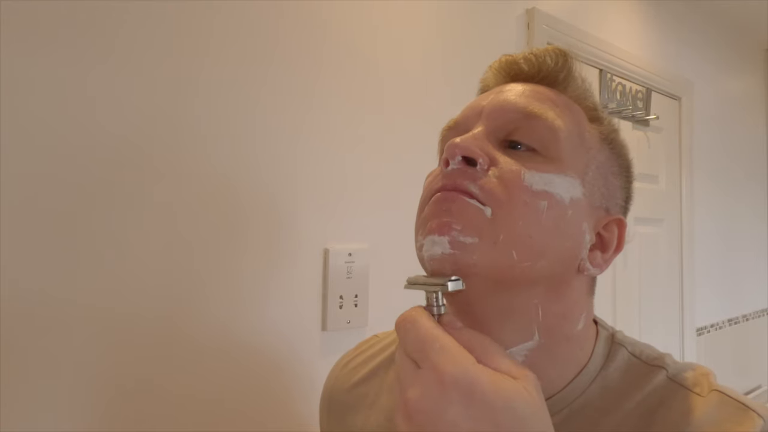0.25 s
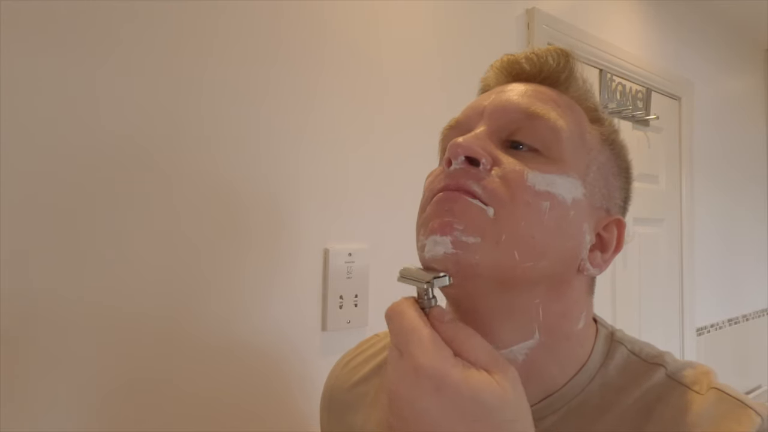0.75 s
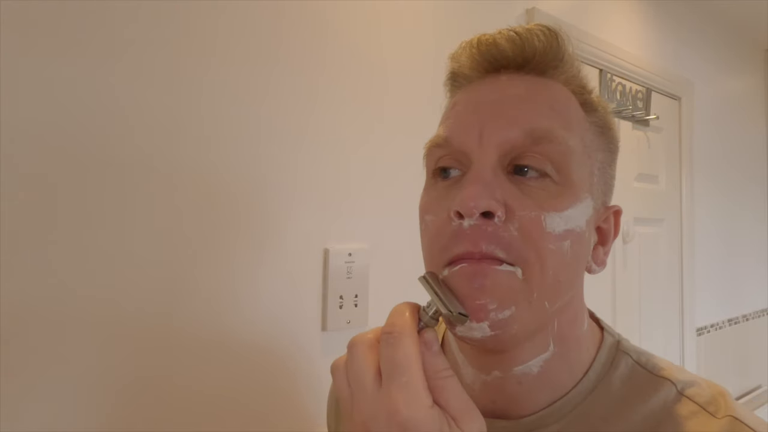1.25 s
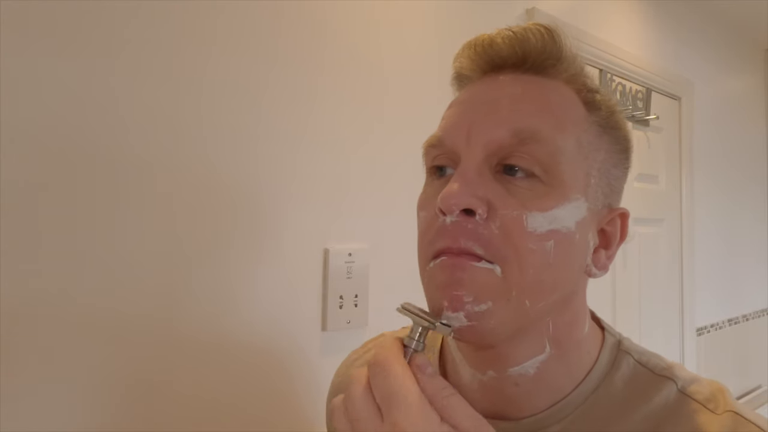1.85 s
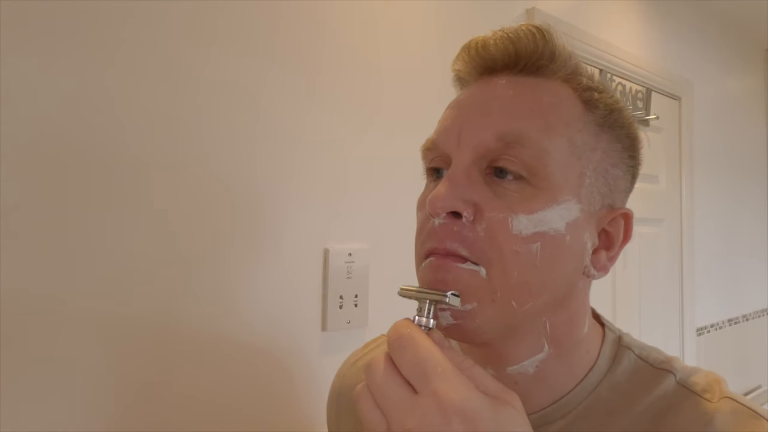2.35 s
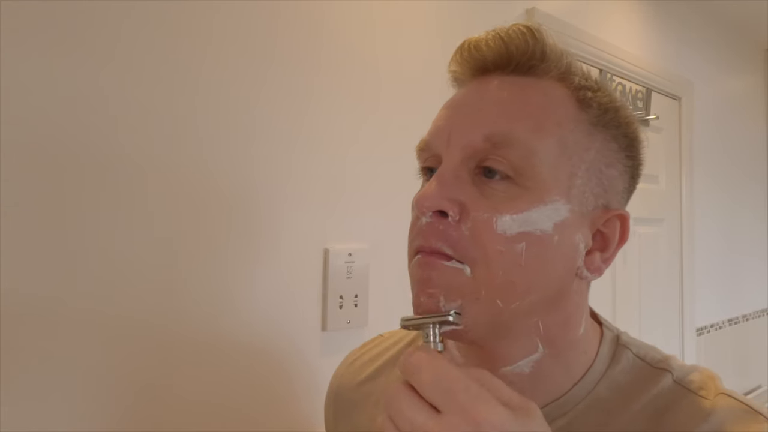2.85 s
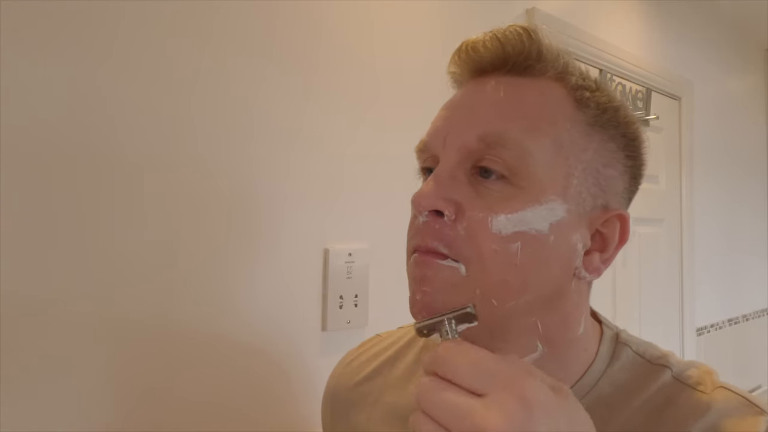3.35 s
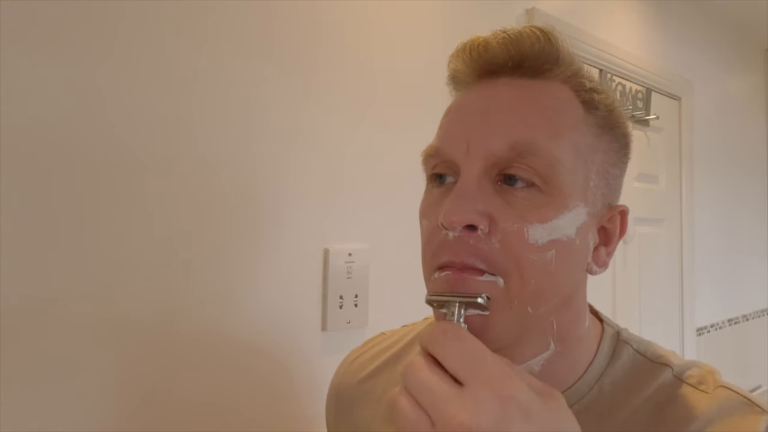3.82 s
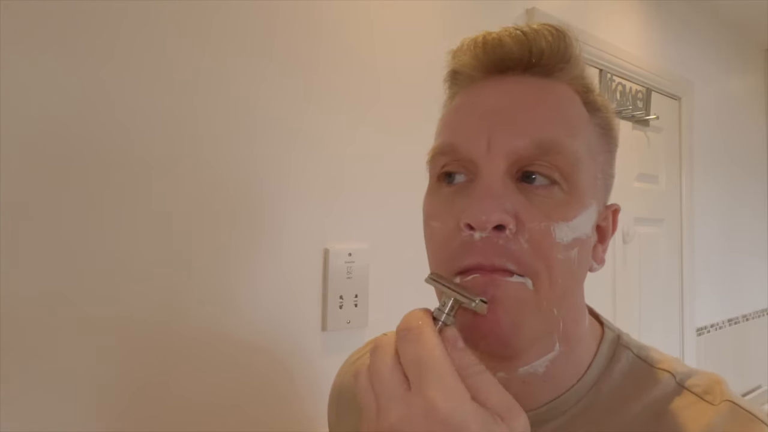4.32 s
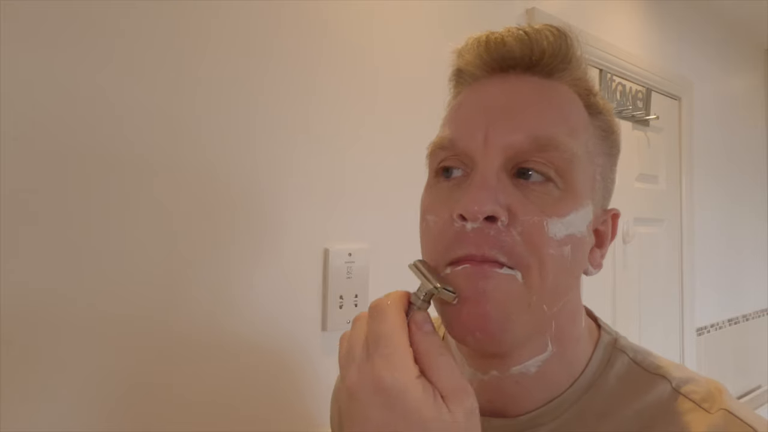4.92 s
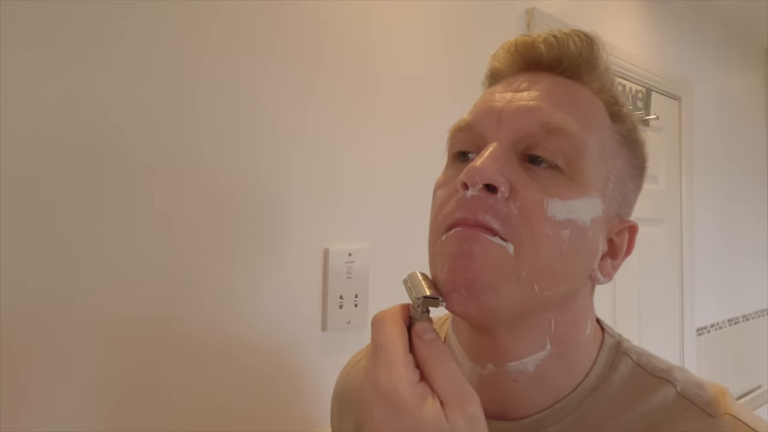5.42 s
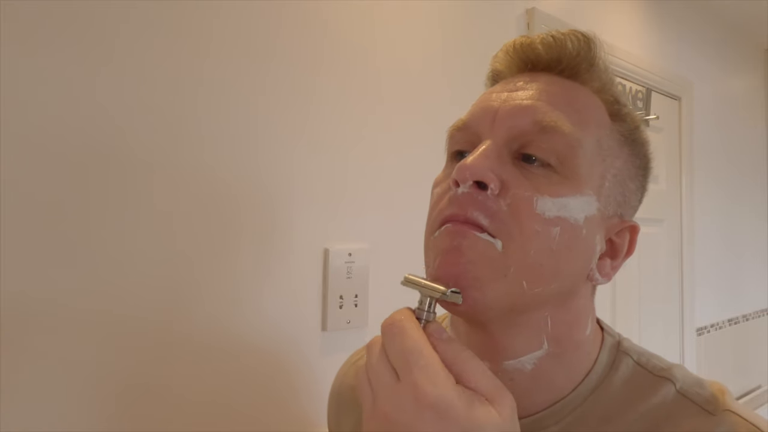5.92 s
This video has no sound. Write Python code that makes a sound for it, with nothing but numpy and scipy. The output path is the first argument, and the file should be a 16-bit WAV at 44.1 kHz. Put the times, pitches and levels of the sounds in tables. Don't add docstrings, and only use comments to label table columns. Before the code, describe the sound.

A loose pipe knocks loudly on a hollow wall panel, slowing to a stop, while a safety razor scrapes stubble in short crisp strokes.

```python
import sys
import numpy as np
from scipy import signal
from scipy.fft import rfft, irfft, next_fast_len
from scipy.io import wavfile
from scipy.ndimage import uniform_filter1d

SR = 44100
rng = np.random.default_rng(int(sys.argv[2]) if len(sys.argv) > 2 else 0)


def put_to_file(sound):
    columns = np.atleast_2d(sound).T
    safe = np.clip(columns, -1, 1)
    whole_steps = np.round(safe * 32767)
    wavfile.write(sys.argv[1], SR, whole_steps.astype(np.int16))


def invert_db(level):
    return 10 ** (np.asarray(level, dtype=float) / 20)


N = 272097
TIME = np.arange(N) / SR

# start_s, rumble_db
AIR = [
    (0.0, -33),
    (1.0, -38),
    (2.2, -34),
    (3.7, -39),
    (4.33, -34),
    (5.15, -36),
    (5.5, -33.5),
    (6.17, -35.5),
]
# pitch_hz, level_db (per Hz)
VENT_TONE = [(30, -18.5), (50, -14.5), (110, -14.5), (200, -5), (350, -3), (456, -11.5), (810, -11),
             (910, -19.5), (1080, -17.5), (2480, -27.5), (7200, -41.5), (9000, -89.5)]
# pitch_hz, width_hz, level_db
DUCT_RESONANCES = [(73.4, 32, -11), (157.8, 28.4, -6.5), (246.4, 12.9, -4.5), (348.5, 17.3, -10)]
# pitch_hz, level_db
HISS_TONE = [(7000, 0.5), (8400, 3.5), (9900, 1), (11500, 8), (13200, 4.5), (14300, -6)]
# pitch_hz, level_db
PORT_TONE = [(10400, -42.5), (10900, -2.5), (11900, 3.5), (12500, 13.5), (13100, -2.5), (13900, -34.5)]
RUSH_DB, RUSH_FOLLOWS = -33.5, 0.62

# start_s, level_db
FLOW = [(0.0, -45), (0.66, -49), (1.0, -48), (1.32, -47), (1.52, -49.5), (2.3, -51.5), (2.72, -65),
        (2.84, -45), (3.0, -42.5), (3.2, -46.5), (3.4, -61), (3.7, -75), (5.7, -65), (5.88, -47),
        (5.97, -44), (6.17, -42)]
# pitch_hz, level_db
WATER_TONE = [(1200, -12.5), (1900, 19), (2500, 19.5), (3200, 8), (5000, 3.5), (7000, -72.5)]

# start_s, pipe_ring_db, panel_db (re ring), upper_panel_db (re ring)
RATTLES = [(0.0024, -24, 4.5, 17.5), (0.1096, -19, -19, -0.5), (0.2384, -29, -15, -4),
           (0.2758, -19, -18, 3), (0.3042, -20.5, -2, -2), (0.3451, -31, -14, 2), (0.36, -28, -7, -5),
           (0.4135, -24, -11, -3), (0.4509, -28.5, -18, 1), (0.7651, -16, -3.5, -8.5),
           (0.7894, -24, -16, 10.5), (0.862, -29, -18, -8), (0.877, -32, -19, -7), (0.9215, -15, -30, -16),
           (0.9427, -10.5, -12, -5), (0.967, -25, -16, -8), (0.984, -26, -15, -8),
           (1.0689, -33.5, 4.5, -16), (1.282, -16.5, -3.5, 2), (1.49, -13, -11, 0.5),
           (1.5304, -33, -11, 18), (1.5698, -35, -19, -3.5), (1.6043, -17.5, -8.5, -12),
           (1.9011, -25.5, -36, -12), (1.9325, -24, -29, -13), (2.0994, -37, -13, 8)]
# start_s, level_db, pitch_hz
TICKS = [(0.0024, -24, 5200), (0.1096, -36, 4800), (0.2384, -23.5, 2850), (0.2758, -35, 3370),
         (0.4135, -48, 3670), (0.4509, -43, 4900), (0.558, -31, 4770), (0.7657, -27, 3470),
         (0.779, -28.5, 3400), (0.7894, -37, 3870), (0.803, -36.5, 3700), (0.9188, -33, 2860),
         (0.954, -34, 3300), (1.0687, -33, 3770), (1.477, -21, 2280), (1.519, -25, 3570),
         (1.5304, -30, 2860), (1.543, -29, 3400), (1.5698, -31, 3020), (1.627, -38, 2920),
         (1.9011, -29, 5800), (1.9325, -26.5, 3440), (2.0994, -33, 4400)]
# start_s, level_db, pitch_hz, width_hz, length_s
RUBS = [(.011, -17, 872, 75.6, 0.035), (0.013, -20.5, 1120, 74, 0.021), (0.159, -28, 1110, 120, 0.015),
        (0.288, -27, 877, 120, 0.015), (0.4555, -30, 1120, 150, 0.016), (0.452, -24, 476, 120, 0.016),
        (0.477, -37.5, 1100, 216, 0.02), (0.766, -26, 861, 120, 0.02), (0.781, -21, 870, 60, 0.016),
        (0.944, -26, 1100, 102, 0.018), (0.94, -18, 614, 59.6, 0.033), (1.116, -28, 850, 277.8, 0.02),
        (1.128, -15, 750, 120, 0.012), (1.143, -21, 860, 150, 0.014), (1.365, -26, 748, 150, 0.014),
        (1.438, -29.5, 851, 111, 0.014), (1.49, -26, 877, 185, 0.016), (1.756, -35, 727, 120, 0.014),
        (1.933, -43, 3580, 244, 0.043), (2.103, -44, 4540, 300, 0.043), (2.362, -52, 2430, 25, 0.09),
        (2.444, -47, 2430, 24.8, 0.087), (3.325, -42, 2300, 250, 0.01)]
CLIP_TOP_DB = -6

# start_s, panel_db, stud_thud_db, pipe_ring_db, crack_db
KNOCKS = [(0.0429, 1.1, 15.5, 1.5, 2.5), (0.2006, 1.7, 12, 1.5, -5.5), (0.376, 0, 11.5, -11, -7),
          (0.5296, 2, 14.5, 2.5, 0.5), (0.7048, 0.8, 11.5, -9, 4.5), (0.839, 2, 11, 6.5, 2.5),
          (1.0299, -1.5, 14, 3, -5), (1.179, -0.4, 14, -11.5, -13.5), (1.3828, 1.8, 17, -0.5, -1.5),
          (1.5078, 2.5, -16, -11.5, 8), (1.6689, -1.5, -1, -6, -4.5), (1.8299, -0.5, 13, -3.5, -11),
          (2.0431, 2, 2, 0.5, -3.5), (2.2514, 0.5, 5.5, -1, 0.5), (2.4757, 0.2, -9.5, -1, -2),
          (2.689, 0.8, -7, -2.5, -11.5), (2.922, -0.4, -18, -6.5, -6), (3.16, 0, -27, -6, -21),
          (3.427, -0.5, -16, -14, -14)]
DEEP_STUD_DB = [-3, 7, 13.5, -4, 3.5, 6, -1, -5, 0, -1, -3, -8, -1, -1, -3, -1, 0, 0, -2]
# pitch_hz, level_db, t60_s, first_swing (direction)
PANEL_MODES = [(175.3, -30.5, 0.314, 1), (307.0, -17.9, 0.271, 1), (322.2, -15.2, 0.18, -1),
               (323.8, -19.1, 0.468, 1), (337.1, -30.1, 0.607, 1), (345.4, -10.0, 0.238, 1),
               (359.0, -27.3, 0.607, 1), (370.7, -8.2, 0.278, -1), (394.1, -10.3, 0.249, 1),
               (409.0, -23.5, 0.488, 1), (420.8, -11.4, 0.137, -1), (432.6, -13.3, 0.155, -1),
               (460.1, -21.4, 0.402, -1), (470.6, -26.5, 0.607, -1), (478.0, -29.0, 0.442, 1),
               (495.4, -28.3, 0.607, -1), (507.3, -16.0, 0.245, -1), (531.2, -20.1, 0.258, -1),
               (557.5, -12.7, 0.107, -1), (575.0, -19.5, 0.21, 1), (623.9, -38.2, 0.607, 1),
               (627.8, -11.3, 0.054, 1), (737.5, -21.5, 0.133, 1), (861.1, -23.9, 0.232, 1)]
# pitch_hz, level_db, t60_s, first_swing (direction and size)
STUD_MODES = [(165.5, -26.5, 0.21, 0.51), (149.6, -27, 0.16, -0.51), (126.4, -35, 0.22, 0.31)]
# pitch_hz, level_db, t60_s
UPPER_MODES = [(691, -20.5, 0.08), (744, -25.5, 0.21), (829, -20, 0.069), (899, -24, 0.18),
               (963, -31, 0.16), (1085, -27, 0.15), (1129, -14.5, 0.036), (1117, -22, 0.096)]
# pitch_hz, level_db, t60_s
PIPE_MODES = [(1903, -36, 0.088), (1986, -20.5, 0.029), (2040, -16.5, 0.024), (2460, -38.5, 0.03),
              (2738, -32, 0.04), (2890, -26, 0.027)]
# pitch_hz, level_db, t60_s
HARD_EDGE_MODES = [(2814, -31, 0.048), (3630, -37.5, 0.037), (4650, -37.5, 0.037), (4910, -38, 0.035),
                   (5370, -40, 0.038), (5800, -36, 0.035), (6110, -41.5, 0.05)]
# pitch_hz, level_db
CRACK_TONE = [(1000, -6), (1450, 4), (3000, 2), (3700, -0.5), (4200, -2), (5200, -5.5), (5850, 0.5),
              (6600, -12), (8500, -38.5)]
# pitch_hz, level_db
CONTACT_TONE = [(6500, -5.5), (9000, -3), (15500, -8)]
# pitch_hz, level_db
BUZZ_TONE = [(480, -9), (600, 3.5), (900, -1), (1200, -7), (1400, -20)]
UPPER_DB, UPPER_PER_PANEL, UPPER_PER_CRACK, UPPER_DB_PER_S_SLOWER = -1.5, 1.4, 0.083, -110
SOFTEN_DB_PER_S_SLOWER = -58
PANEL_ECHO_DB = -22

# land_s, pull_s, blade_db (at lift-off), swell_db (during the pull), skin_db (re blade)
STROKES = [(.045, 0.068, -58.5, -5, 7), (.140, 0.042, -37.5, 3.5, -3), (.462, 0.042, -37.5, 16, -2),
           (.742, 0.12, -45, 2, 2), (1.306, 0.089, -36, 18, 0), (1.676, 0.1, -37.5, 18, -2.5),
           (2.066, 0.079, -40, 4, -0.5), (2.433, 0.05, -34, 2, -5.5), (2.803, 0.1, -38.5, 13, 2),
           (3.245, 0.056, -36, 10.5, 1), (3.557, 0.039, -40, 9, -1), (3.86, 0.035, -41, 26, 1),
           (4.11, 0.036, -44.5, 18, 6.5), (4.42, .11, -38.5, 34, 0.5), (4.75, 0.067, -37, 36, 0),
           (5.01, 0.064, -42.5, 18, 2.5), (5.345, 0.17, -55.5, 4, 8), (5.497, 0.12, -47.5, -7, 0),
           (5.925, 0.083, -32.5, 15, -3)]
# start_s, peak_db
CATCHES = [(0.1446, -30), (0.4483, -37), (0.4665, -17), (0.744, -27.5), (0.7607, -33), (1.3084, -43),
           (1.321, -36), (1.351, -17.5), (1.678, -30), (1.6945, -33), (1.7245, -31), (2.0313, -35),
           (2.0736, -19.5), (2.4059, -44), (2.435, -39), (2.4638, -17), (2.7894, -48), (2.8049, -23),
           (2.8374, -18), (2.8928, -40), (3.2475, -40), (3.268, -35), (3.297, -28), (3.5698, -22),
           (3.5962, -23.5), (3.8793, -44), (3.895, -48), (4.131, -43), (4.1435, -42), (4.4957, -33),
           (4.518, -21), (4.535, -32), (4.8364, -39), (5.0763, -21), (5.498, -20), (5.512, -24),
           (5.9283, -21), (5.941, -34), (5.9674, -13), (5.991, -18), (6.02, -27)]
# start_s, drag_db (re blade)
LATHER_LEFT = [
    (0, -7),
    (1.4, -5),
    (2.45, -9),
    (2.85, 0),
    (3.6, -6),
    (4.13, 8),
    (4.5, -4.5),
    (5.05, 1.5),
    (5.5, -3.5),
    (5.95, -2.5),
]
# pitch_hz, level_db
BLADE_TONE = [(8900, -18.5), (9600, -6.5), (10500, -10), (11400, 1.5), (12200, -1.5), (12800, -3.5),
              (13300, -8), (14600, -30.5)]
# pitch_hz, width_hz, level_db
EDGE_MODES = [(10600, 470, -13.5), (11230, 850, -16.5), (12630, 600, -11.5), (6670, 1900, -8.5)]
# pitch_hz, level_db
SKIN_TONE = [(2600, -16), (3500, 1.5), (4500, 4.5), (7000, -1), (8300, -8), (9300, -3.5)]
# pitch_hz, level_db
LATHER_TONE = [(900, -18.5), (1700, -10.5), (2500, -5.5), (3200, -8.5), (4200, -21)]
LAND_DB_PER_S, SWELL_CURVE = 1503, 0.43
LIFT_DB, LIFT_S = -9.5, 0.056
BLADE_DB_PER_S, SKIN_DB_PER_S, LATHER_DB_PER_S = -140, -99.5, -38
SKIN_LAGS_DB = 0.5


def unit(x):
    return x / np.sqrt(np.mean(x ** 2))


def curve(table):
    s, *columns = np.transpose(table)
    return [np.interp(TIME, s, column, right=column[-1]) for column in columns]


def walk(rate_hz):
    hold = int(SR / rate_hz)
    steps = np.repeat(rng.standard_normal(N // hold + 1), hold)
    return unit(uniform_filter1d(uniform_filter1d(steps, hold), hold)[:N])


def colour(x, tone):
    hz, db = np.transpose(tone)
    size = next_fast_len(len(x))
    log_hz = np.log(np.arange(size // 2 + 1) * SR / size + 1)
    gain = invert_db(np.interp(log_hz, np.log(hz), db, left=-90, right=-90))
    return unit(irfft(rfft(x, size) * gain, size)[:len(x)])


def resonance(x, hz, width_hz):
    peak = signal.iirpeak(hz, hz / (1.5 * width_hz), fs=SR)
    return unit(signal.lfilter(*peak, signal.lfilter(*peak, x)))


def add(out, s, sound):
    start = max(int(s * SR), 0)
    out[start:start + len(sound)] += sound


def fades(times, db, t60):
    blows = np.zeros(N)
    np.add.at(blows, np.clip(times * SR, 0, N - 1).astype(int), invert_db(db))
    return signal.lfilter([1], [1, -np.exp(-np.log(1000) / (t60 * SR))], blows)


def strike(times, db, modes, scatter_db=0., detune=0., tilt_db=0.):
    out, t = np.zeros(N + SR), TIME[:SR // 2]
    modes = np.array(modes)
    hz, mode_db, t60 = modes[:, :3].T[:, :, None]
    if modes.shape[1] > 3:
        swing = modes[:, 3:]
    else:
        swing = (-1) ** np.arange(len(modes))[:, None]
    fade = np.exp(-np.log(1000) * t / t60)
    chance = rng.standard_normal((len(times), 2, len(modes), 1))
    for s, blow_db, tilt, (mix, pitch) in zip(times, db, tilt_db + 0 * times, chance):
        softness_db = tilt * np.maximum((hz / 360) ** 2 - 1, 0)
        gain = swing * invert_db(blow_db + mode_db + scatter_db * mix + softness_db)
        tones = np.sin(2 * np.pi * hz * (1 + detune * pitch) * t)
        add(out, s, np.sum(gain * tones * fade, axis=0))
    return out[:N]


def room(x, t60, wet_db, gap_s):
    t = TIME[:SR // 2]
    tail = rng.standard_normal(len(t)) * np.exp(-np.log(1000) * t / t60) * np.clip(t / gap_s, 0, 1)
    tail /= np.sqrt(np.sum(tail ** 2))
    return x + invert_db(wet_db) * signal.fftconvolve(x, tail)[:N]


def ventilation():
    rumble_db = curve(AIR)[0]
    rush_db = RUSH_DB + RUSH_FOLLOWS * (rumble_db - rumble_db.mean())
    duct = colour(rng.standard_normal(N), VENT_TONE)
    low = signal.sosfiltfilt(signal.butter(2, 400, fs=SR, output="sos"), duct)
    rumble = low * invert_db(1.0 * walk(4.7))
    for hz, width, db in DUCT_RESONANCES:
        rumble += invert_db(db + 2.8 * walk(3.94)) * resonance(rng.standard_normal(N), hz, width)
    rush = (duct - low) * invert_db(rush_db + 1.0 * walk(8.9))
    hiss = invert_db(-71.5) * colour(rng.standard_normal(N), HISS_TONE)
    side_hiss = invert_db(-73.5) * colour(rng.standard_normal(N), PORT_TONE)
    return rumble * invert_db(rumble_db) + rush + hiss, side_hiss


def water():
    gurgle_db = 2.0 * walk(25)
    return invert_db(curve(FLOW)[0] + gurgle_db) * colour(rng.standard_normal(N), WATER_TONE)


def rattles():
    s, ring_db, panel_db, upper_db = np.transpose(RATTLES)
    panel = strike(s, ring_db + panel_db - 0.5, PANEL_MODES, scatter_db=5.5, detune=0.012, tilt_db=2.5)
    upper = strike(s, ring_db + upper_db + 6, UPPER_MODES, scatter_db=2.5, detune=.01)
    ring = strike(s, ring_db + 17, PIPE_MODES[:3], scatter_db=1.5, detune=.003)
    ring += strike(s, ring_db + 17 + CLIP_TOP_DB, PIPE_MODES[3:], scatter_db=2.5, detune=.003)
    metal = np.r_[ring, np.zeros(SR)]
    t = TIME[:SR // 5]
    for start, db, hz in TICKS:
        tick = resonance(rng.standard_normal(len(t)), hz, .14 * hz)
        add(metal, start, invert_db(db - 3) * np.exp(-t / .006) * tick)
    for start, db, hz, width, length in RUBS:
        rub = resonance(rng.standard_normal(len(t)), hz, width)
        swell = np.sin(np.pi * np.clip(t / length, 0, 1) ** 0.41) ** .5
        add(metal, start, invert_db(db) * swell * rub)
    grit = fades(s, ring_db - 27.5, 0.15) * colour(rng.standard_normal(N), WATER_TONE)
    return panel, upper, metal[:N] + grit


def knocks():
    s, panel_db, thud_db, ring_db, crack_db = np.transpose(KNOCKS)
    slowing_s = np.maximum(np.diff(s, prepend=0) - .195, 0)
    soft_db = SOFTEN_DB_PER_S_SLOWER * slowing_s
    panel = strike(s, panel_db, PANEL_MODES, scatter_db=0.5, tilt_db=soft_db)
    panel += strike(s, thud_db, STUD_MODES[:2], scatter_db=1.2, detune=.015)
    panel += strike(s, thud_db + DEEP_STUD_DB, STUD_MODES[2:], detune=.02)
    panel += strike(s, crack_db - 0.8, HARD_EDGE_MODES, scatter_db=3.5, detune=0.008)

    upper_db = UPPER_DB + UPPER_PER_PANEL * panel_db + UPPER_PER_CRACK * crack_db
    upper_db += UPPER_DB_PER_S_SLOWER * slowing_s
    upper = strike(s, upper_db, UPPER_MODES, scatter_db=2.5, detune=0.014)
    noise = rng.standard_normal(N)
    upper += fades(s, upper_db - 27.5, 0.16) * colour(np.roll(noise, SR), BUZZ_TONE)

    crack_fade = fades(s, crack_db - 30.5, 0.025) + fades(s, crack_db - 38.5, 0.11)
    crack = crack_fade * colour(noise, CRACK_TONE)
    crack += fades(s, crack_db - 53.5, 0.027) * colour(rng.standard_normal(N), CONTACT_TONE)
    ring = strike(s, ring_db, PIPE_MODES, scatter_db=3.0, detune=0.0026)
    return panel, upper, ring + crack


def pipe():
    panel, upper, metal = np.add(rattles(), knocks())
    echoing = room(panel, 0.66, PANEL_ECHO_DB, 0.31)
    echoing += room(upper, 0.51, -3.5, 0.028)
    echoing += room(metal, 0.35, -5.0, 0.013)
    return echoing + water()


def strokes(fade_db_per_s, offset_db, lag_db=0):
    land, pull, blade_db, swell_db = np.transpose(STROKES)[:4, :, None]
    t = TIME[::20]
    since = t - land
    after = np.maximum(t - land - pull, 0)
    land_rate = LAND_DB_PER_S / (0.5 + np.maximum(swell_db, 0) / 10.0)
    rise = land_rate * np.minimum(since, 0)
    rise -= (swell_db + lag_db) * (1 - np.clip(since / pull, 0, 1) ** SWELL_CURVE)
    fall = LIFT_DB * np.minimum(after / LIFT_S, 1) + fade_db_per_s * after
    return np.interp(TIME, t, invert_db(blade_db + offset_db + rise + fall).sum(axis=0))


def snaps(rate_hz, spread_db):
    when = rng.random(N) < rate_hz / SR
    strength_db = spread_db * np.minimum(rng.exponential(size=N), 4)
    return when * rng.choice([-1, 1], N) * invert_db(strength_db)


def razor():
    skin_db = np.array(STROKES)[:, 4:]
    lather_db = np.interp(np.array(STROKES)[:, :1], *np.transpose(LATHER_LEFT))
    blade_gain = strokes(BLADE_DB_PER_S, 0)
    skin_gain = strokes(SKIN_DB_PER_S, skin_db, SKIN_LAGS_DB)
    lather_gain = strokes(LATHER_DB_PER_S, lather_db, SKIN_LAGS_DB)

    slips = unit(fades(rng.random(1100) * N / SR, 3.0 * rng.standard_normal(1100), .035))
    slips = invert_db(-3.0) * (0.8 + 0.34 * slips)
    s, catch_db = np.transpose(CATCHES)
    catches = fades(s, catch_db - 13.5, 0.032)
    judder = blade_gain * slips + catches

    cut = unit(snaps(3200, 3.2))
    blade = colour(cut + 0.37 * rng.standard_normal(N), BLADE_TONE)
    for hz, width, db in EDGE_MODES:
        blade += invert_db(db) * resonance(cut, hz, width)
    scrape = colour(cut + 2.4 * rng.standard_normal(N), SKIN_TONE)
    skin = (skin_gain * slips + invert_db(-17.5) * catches) * scrape
    skin += lather_gain * slips * colour(cut + 2.1 * rng.standard_normal(N), LATHER_TONE)
    side = invert_db(-6) * colour(snaps(2500, 3.5), PORT_TONE) - 0.084 * blade
    return room(judder * blade + skin, 0.24, -8.0, 0.0083), room(judder * side, .2, -6.0, .006)


def scene():
    air, air_side = ventilation()
    wall = pipe()
    shave, shave_side = razor()
    mid, side = air + wall + shave, air_side + shave_side
    return np.array([mid + side, mid - side])


def roll_off(x):
    return signal.sosfilt(signal.butter(12, 15400, fs=SR, output="sos"), x)


def record(dry):
    heard = signal.sosfilt(signal.butter(2, 35, "high", fs=SR, output="sos"), dry)
    heard = signal.lfilter(*signal.iirnotch(9120, 17., fs=SR), heard)
    heard = signal.sosfilt(signal.cheby2(5, 40, 15200, fs=SR, output="sos"), heard)
    mix = np.clip(1.017 * heard, -1, 1)
    return roll_off(mix)


dry = scene()
out = record(dry)
put_to_file(out)
```